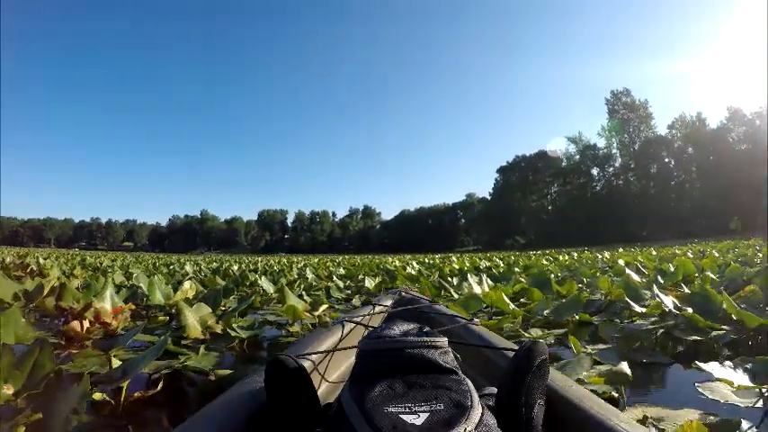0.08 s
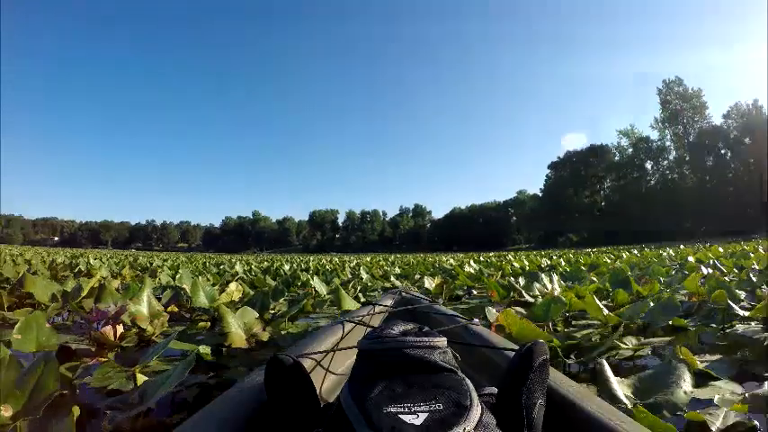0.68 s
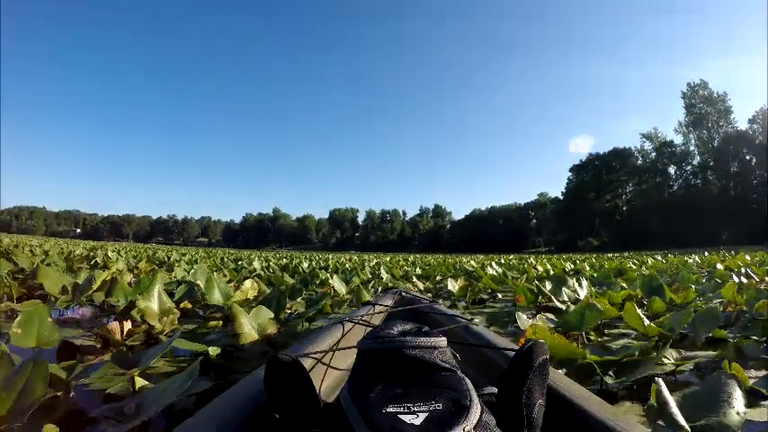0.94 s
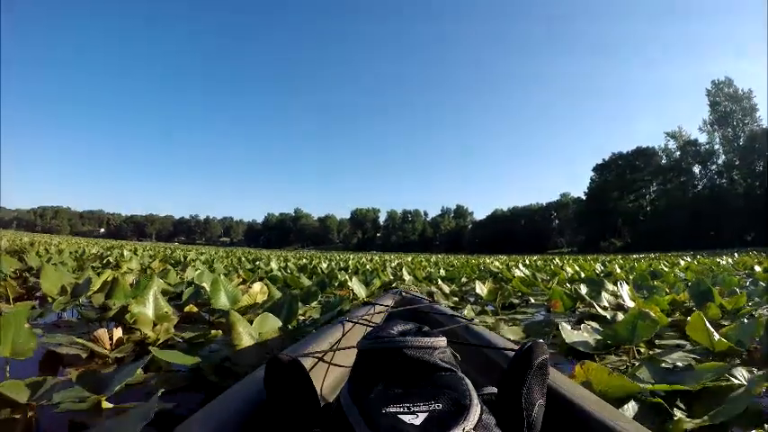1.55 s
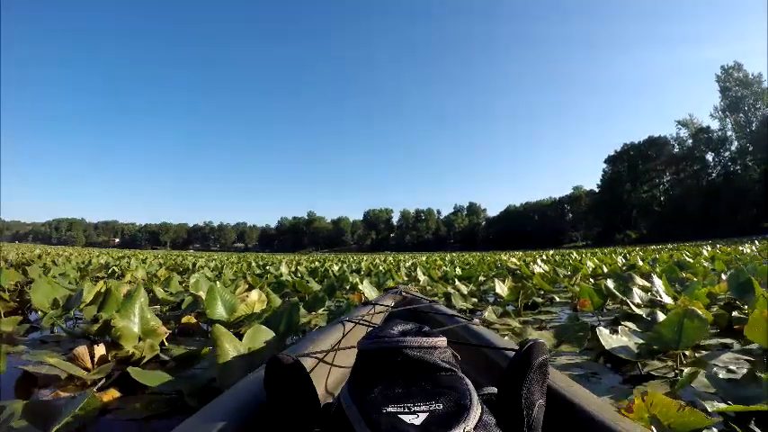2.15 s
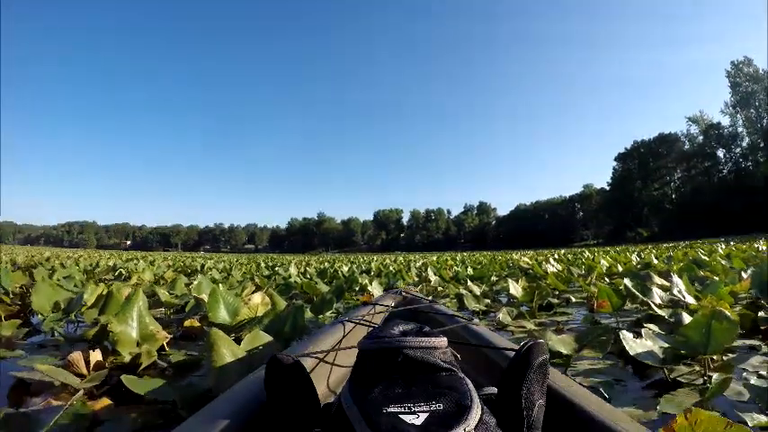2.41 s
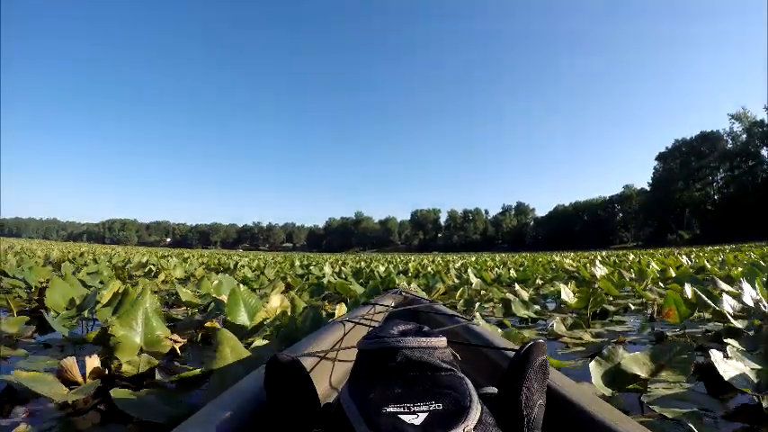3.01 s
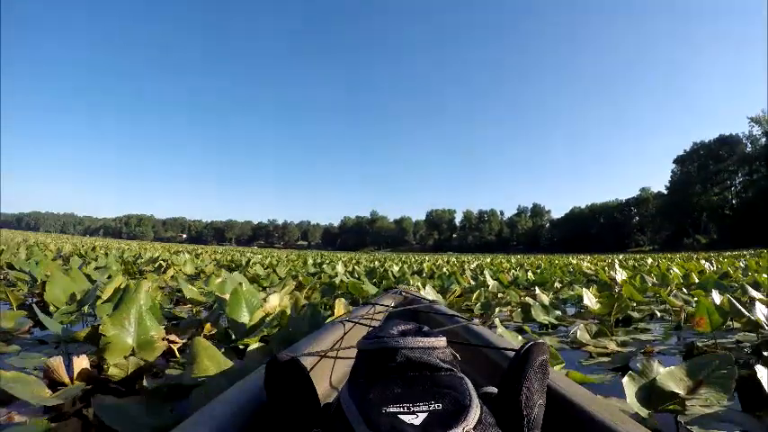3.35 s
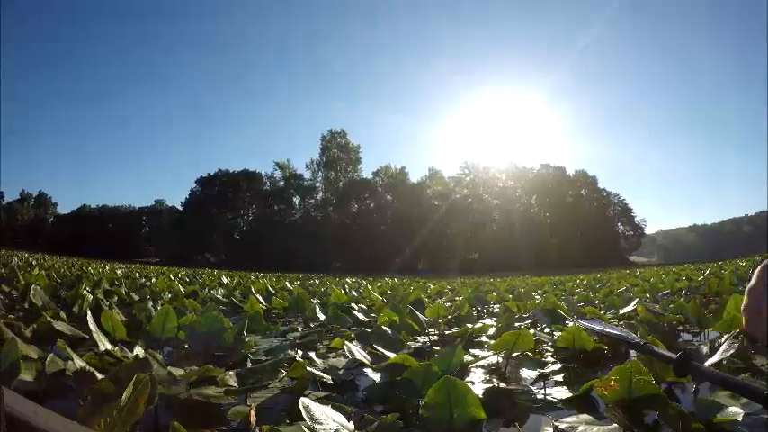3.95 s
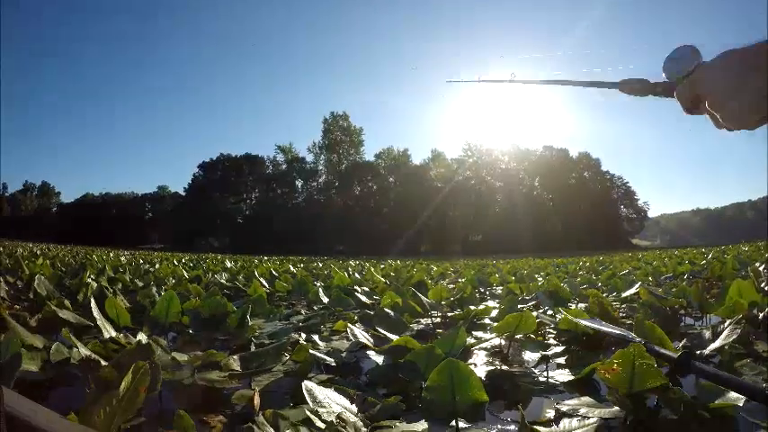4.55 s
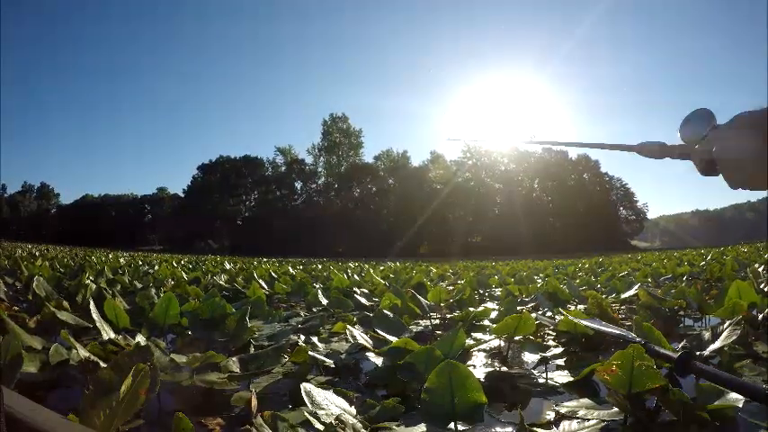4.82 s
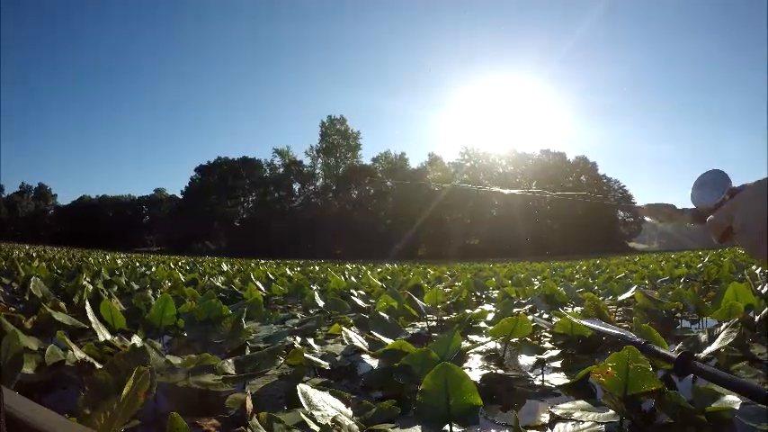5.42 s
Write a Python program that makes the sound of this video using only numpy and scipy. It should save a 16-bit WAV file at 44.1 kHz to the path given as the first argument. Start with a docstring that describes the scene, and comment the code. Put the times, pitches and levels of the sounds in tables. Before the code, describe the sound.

Heard from the deck of a plastic kayak on a lake, a sharp knock opens a glide through lily pads. Stems drum on the hollow hull, wet leaves rub and flick along the sides, and water sloshes softly. The brushing stops abruptly. A fishing rod then swishes through the air and line hisses off the spool, fading over low wind and rocking rumble.

```python
"""A plastic kayak glides through lily pads, heard from its own deck. After one hard knock, stems drum
on the hollow hull and excite its resonances, water sloshes as a crowd of ringing bubbles, and wet leaves
rub and flick along the sides. The scene changes abruptly to the boat at rest, where an angler casts:
the rod sheds eddies with a swish, line hisses off the spool and the swing rocks the boat.
Light wind and a faint hiss lie under it all."""
import sys
import numpy as np
from scipy import signal
from scipy.fft import rfft, irfft
from scipy.io import wavfile
from scipy.ndimage import uniform_filter1d

SR = 44100
rng = np.random.default_rng(int(sys.argv[2]) if len(sys.argv) > 2 else 0)


def persist_wave(psi):
    """Save psi, clipped to +-1, as 16-bit WAV."""
    counts = np.round(np.clip(psi, -1, 1) * 32767).astype(np.int16)
    wavfile.write(sys.argv[1], SR, np.atleast_2d(counts).T)


N = 245195
T = np.arange(N) / SR
GLIDE_END_S = 3.692
STROKE_S, SWING_S, RELEASE_S = 3.966, 4.054, 4.088  # stroke starts, rod tip is fastest, line flies free

# Spectra. Each row: frequency in Hz, relative spectral density in dB.
WIND_SPECTRUM = [(15, 3.5), (27, -11), (44, -8), (60, -18.5), (80, -25.5), (98, -26.5), (135, -37.5),
                 (190, -38), (300, -51.5)]
HISS_SPECTRUM = [(100, -28), (170, -3), (198, 8), (217, 3.5), (367, -0.5), (442, -2), (543, -1.5),
                 (734, -4.5), (902, -4.5), (1170, -7.5), (2260, -7.5), (5250, -11), (7100, -15),
                 (7800, -14), (8500, -16), (10300, -17.5), (12400, -21), (15000, -17.5)]
PEEL_SPECTRUM = [(1400, 8.5), (2000, 6.5), (2600, 3.5), (3400, 1), (4300, 2), (5400, -10), (6600, 2.5),
                 (8500, -9)]  # pops of wet pads peeling off
LEAF_SPECTRUM = [(760, -31), (1300, -6), (1770, 6.5), (2740, 3), (3020, -13), (3270, 1), (4140, -5),
                 (5360, -10.5), (6560, -9), (7170, -15), (9000, -32), (11700, -57), (19800, -120)]  # the leaves themselves
RUB_SPECTRUM = [(160, -42), (280, -6), (361, 1), (445, -6.5), (512, -0.5), (598, -11), (664, -4.5),
                (733, -9), (781, -1.5), (855, -10), (991, 1.5), (1210, -14.5), (1500, -31), (1950, -29),
                (3300, -120)]  # the hull rubbed by leaves
HULL_SPECTRUM = [(115, -13), (138, 3), (175, 0.5), (212, -2.5), (260, -11), (330, -20.5), (450, -25.5)]  # the hollow hull under the stems
# Swells. Each row: centre in seconds, half-width in seconds, level in dB.
WIND_GUSTS = [(0.05, 0.15, -33.5), (0.33, 0.26, -40), (0.63, 0.038, -33.5), (0.85, 0.52, -35),
              (2.32, 0.023, -40.5), (2.63, 0.047, -36), (3.25, 1, -46), (3.98, 0.061, -33.5),
              (4.135, 0.064, -29), (4.17, 0.21, -33), (4.4, 0.25, -40.5), (4.79, 0.053, -41.5),
              (4.97, 0.066, -50), (5.34, 0.08, -43)]  # gusts and rocking of the boat
WATER_SHOVES = [(0.64, 0.053, -57.5), (0.728, 0.037, -53), (0.86, 0.081, -64), (2.83, 0.039, -56),
                (3.02, 0.15, -67), (3.3, 0.2, -64.5), (4.19, 0.23, -66)]  # water pushed aside by the hull
STEM_CLUMPS = [(0.315, 0.1, -39), (0.62, 0.043, -43), (0.79, 0.033, -36.5), (1.07, 0.034, -47),
               (2.38, 0.062, -46), (2.76, 0.14, -40.5), (3.27, 0.074, -42.5)]  # thick stems passing underneath
# Bands of the fishing line. Each row: centre in Hz, width in Hz, relative level in dB.
GUIDE_BANDS = [(2440, 130, -9), (2850, 200, -3.5), (3210, 220, 0), (3520, 390, 3.5), (5100, 250, -14),
               (5850, 400, -10), (7900, 700, -12)]  # singing in the guides
WHIP_BANDS = [(2100, 600, 0), (4400, 1700, -2.5), (5800, 700, -2.5), (6750, 350, -7), (7820, 750, -4),
              (11000, 4300, -6)]  # bright hiss at the height of the stroke
WHISTLE_BANDS = [(9950, 770, -4), (10900, 600, -4), (11650, 600, 0), (12450, 750, -2)]  # cutting the air
# Drops and bubbles beside the hull, then bumps and glugs under it.
# Each row: start in seconds, level in dB, initial frequency in Hz, decay time in seconds.
BUBBLE_RINGS = [(0.104, -46, 1274, 0.0052), (.264, -46, 770, 0.0068), (.275, -39, 970, 0.0023),
                (0.579, -60, 1096, 0.01), (.642, -52.5, 746, 0.039), (.868, -58, 1075, 0.0084),
                (2.043, -55, 3400, 0.0026), (2.261, -57, 1730, 0.003), (2.545, -54.5, 1410, 0.003),
                (2.594, -54.5, 1100, 0.0065), (2.905, -60, 6070, 0.0065), (2.94, -51.5, 7780, 0.0008),
                (3.05, -53.5, 1030, 0.0062), (3.094, -45.5, 2200, 0.0031), (3.680, -40.5, 2430, 0.0017)]
HULL_BUMPS = [(0.044, -27, 60.7, 0.012), (0.047, -29.5, 116, 0.014), (0.566, -45.5, 271, 0.01),
              (0.61, -29, 51, 0.016), (0.617, -48, 365, 0.008), (0.617, -40, 140, 0.0069),
              (.712, -56, 550, 0.0044), (0.713, -49, 410, 0.0039), (0.739, -29.5, 131, 0.013),
              (0.848, -35, 192.4, 0.013), (0.881, -49, 330, 0.0086), (2.02, -45.5, 164, 0.016),
              (2.295, -33, 40, 0.018), (2.348, -39, 88, 0.017), (2.573, -32.5, 102.4, 0.017),
              (2.78, -42, 212, 0.019), (3.562, -45, 187, 0.017), (4.07, -44, 132, 0.015),
              (4.104, -26, 38, 0.027)]
# Leaves and stems flicking the hull. Each row: start in seconds, level in dB, centre in Hz, width in Hz.
LEAF_FLICKS = [(.077, -58.5, 5500, 5000), (.105, -52.5, 2400, 2500), (.135, -55, 1900, 1300),
               (0.148, -44.5, 2080, 1700), (0.149, -52, 4240, 600), (0.174, -46, 2520, 800),
               (0.197, -50, 2060, 2220), (.199, -60, 4740, 901), (0.228, -51, 3870, 700),
               (0.288, -51.5, 2600, 600), (0.371, -54.5, 4280, 1530), (0.607, -53, 2380, 900),
               (.711, -60, 2670, 500), (1.130, -52.5, 2360, 900), (2.043, -57, 3480, 900),
               (2.238, -58, 2050, 600), (2.434, -52, 1930, 1500), (2.588, -61, 1750, 800),
               (2.628, -57, 1590, 1500), (2.769, -56, 4330, 1196), (2.784, -60, 5400, 2400),
               (2.797, -59, 3600, 700), (2.834, -57, 4140, 1200), (2.867, -55, 4400, 900),
               (2.8847, -42.5, 3600, 1100), (2.8995, -51, 3370, 900), (2.981, -58, 3000, 900),
               (2.939, -51, 4000, 2970), (2.939, -65, 10000, 4000), (3.092, -55.5, 3000, 3000),
               (3.112, -61, 5500, 3000), (3.095, -61, 6500, 900), (3.14, -65, 6500, 1500),
               (3.224, -54, 3860, 2520), (3.262, -57, 3700, 1000), (3.275, -54, 3900, 2000),
               (3.279, -63, 7000, 2400), (3.297, -64, 4800, 4000), (3.31, -49, 2600, 1500),
               (3.398, -51, 2060, 1100), (3.398, -58, 4000, 2000), (3.513, -52, 2110, 900),
               (3.545, -58.5, 4300, 2200), (3.679, -49.5, 2550, 900)]
# Bunches of dragging pads. Each row: centre in seconds, half-width in seconds, level in dB, pitch in Hz.
PAD_DRAGS = [(0.175, 0.12, -61, 2420), (0.347, 0.21, -67.5, 4280), (0.777, 0.03, -68.5, 6900),
             (1.157, 0.07, -67.5, 4300), (2.897, 0.077, -62.5, 3770), (3.29, 0.23, -66.5, 4000),
             (3.577, 0.096, -62, 3440)]
# Modes of the deck. Each row: frequency in Hz, relative level in dB, time to fall 60 dB in seconds.
DECK_MODES = [(335, 7.5, 0.014), (457, -6, 0.024), (666, -1, 0.019), (993, -4.5, 0.084), (1120, -15, 0.034),
              (1680, -6, 0.034), (1880, -19, 0.079), (2194, -1.5, 0.015), (2354, 9.5, 0.0092),
              (2510, -0.5, 0.012), (3700, -7.5, 0.008), (4550, -26, 0.027)]
# The knock and its chatter. Each row: start in seconds, gain in dB.
DECK_CONTACTS = [(.0382, -28), (.0398, -28), (.0426, -26)]
# Force of the hull on the pads as it slows and is driven on. Each row: time in seconds, push in dB.
HULL_PUSH = [(0.1, 1.5), (0.35, 4), (0.7, 2.5), (1.0, 1), (1.3, -1), (1.9, -1.5), (2.18, -2.5), (2.5, -0.5),
             (2.8, 1.5), (3.1, 0), (3.68, -1)]


def undb(db):
    """Amplitude grows tenfold for every 20 dB."""
    return 10 ** (np.asarray(db) / 20)


def unit(x):
    """Normalisation to an rms of 1."""
    return x / np.sqrt(np.mean(x ** 2))


def steady(x):
    """Division by the short-term rms, so that an envelope alone sets the strength."""
    return x / np.sqrt(np.abs(uniform_filter1d(x ** 2, size=4000)) + 1e-12)


def noise():
    """White noise: equal mean power at every frequency."""
    return rng.standard_normal(N)


def wander(rate):
    """Linear interpolation of `rate` random values a second, with a spread near 1."""
    knots = rng.standard_normal(4096)
    return 1.2 * np.interp(T * rate, np.arange(len(knots)), knots)


def impacts(rate, spread_db):
    """A Poisson process of `rate` tiny impacts a second, a few much larger than the rest."""
    size = undb(spread_db * np.minimum(rng.exponential(size=N), 4))
    return unit((rng.random(N) < rate / SR) * size * rng.choice([-1, 1], N))


def colour(x, spectrum):
    """Spectral shaping to an rms of 1, falling 30 dB an octave past the ends of the table."""
    hz, db = np.transpose(spectrum)
    octave = np.log2(np.maximum(np.fft.rfftfreq(N, 1 / SR), 1))
    outside = np.abs(octave - np.clip(octave, np.log2(hz[0]), np.log2(hz[-1])))
    gain = undb(np.interp(octave, np.log2(hz), db) - 30 * outside)
    return unit(irfft(rfft(x) * gain, N))


def band(x, hz, width):
    """Two equal resonators in cascade give a band with steep sides."""
    hz = min(hz, .4 * SR)
    b, a = signal.iirpeak(hz, max(hz / width, .5), fs=SR)
    return signal.lfilter(b, a, signal.lfilter(b, a, x))


def noise_bands(bands):
    """Resonances driven by independent noises add in power; the sum has an rms of 1."""
    return unit(sum(undb(db) * unit(band(noise(), hz, width)) for hz, width, db in bands))


def swells(rows):
    """Gaussian swells add in power. Each row: centre in seconds, half-width in seconds, level in dB."""
    return np.sqrt(sum((undb(db) * np.exp(-2 * ((T - s) / width) ** 2)) ** 2 for s, width, db in rows))


def envelope(start, end, rise_db_per_s, fall_db_per_s):
    """Exponential growth until start, a hold at 1 until end, then exponential decay."""
    return undb(-rise_db_per_s * np.maximum(start - T, 0) - fall_db_per_s * np.maximum(T - end, 0))


def add(out, s, x):
    """Superposition of a short sound at s seconds."""
    i = max(int(s * SR), 0)
    out[i:i + len(x)] += x[:N - i]


def rings(rows, rise, climb):
    """Damped oscillators; rise is a fraction of the decay time, climb a fraction of the pitch."""
    out, t = np.zeros(N), T[:SR // 4]
    for s, db, hz, decay in rows:
        shape = (1 - np.exp(-t / (rise * decay))) ** 2 * np.exp(-t / decay)
        pitch = hz * (1 + climb * (1 - np.exp(-t / decay)))
        add(out, s, undb(db) * shape / shape.max() * np.sin(2 * np.pi * np.cumsum(pitch) / SR))
    return out


def air(moving_db=-45.5, resting_db=-49):
    """Pressure fluctuations of wind and rocking rumble; ripples drive a hull resonance; treble hisses."""
    breeze = undb(np.where(T < GLIDE_END_S, moving_db, resting_db))
    rumble = steady(colour(noise(), WIND_SPECTRUM)) * np.hypot(breeze, swells(WIND_GUSTS))
    murmur = unit(band(noise(), hz=95, width=38)) * undb(-59)
    hiss = colour(noise(), HISS_SPECTRUM) * undb(-64.5 + .5 * wander(rate=8.5))
    treble = band(noise(), hz=12360, width=2300)
    flicker = undb(11 * np.tanh(0.91 * wander(rate=210) - 1.4))
    return rumble + murmur + hiss + unit(treble * flicker) * undb(-79)


def rod(eddy_hz=1130, sag=0.12, waver=0.1, half_width_s=0.0072):
    """Vortex shedding: eddies leave the tip almost regularly, highest in pitch where it is fastest."""
    speed = 1 / (1 + ((T - SWING_S) / half_width_s) ** 2)
    pitch = eddy_hz * (1 - sag * (1 - speed)) * (1 + waver * wander(rate=850))
    eddies = unit(np.sin(2 * np.pi * np.cumsum(pitch) / SR))
    whole_swing = swells([(SWING_S, 0.054, -67)])
    return eddies * np.hypot(undb(-50.5) * speed, whole_swing)


def fishing_line():
    """Friction and airflow: line sings in the guides, cuts the air and brushes the slowing spool."""
    running = undb(-58.5) * envelope(STROKE_S, RELEASE_S, rise_db_per_s=1100, fall_db_per_s=113)
    pull = swells([(RELEASE_S - 0.016, 0.03, -52)])  # the lure draws the line taut
    whip = undb(-57.5) * envelope(RELEASE_S - 0.022, RELEASE_S, rise_db_per_s=150, fall_db_per_s=300)
    unwinding = undb(-61.5) * envelope(RELEASE_S, RELEASE_S, rise_db_per_s=400, fall_db_per_s=36)
    singing = noise_bands(GUIDE_BANDS) * np.hypot(running, pull)
    hiss = noise_bands(WHIP_BANDS) * whip
    whistle = noise_bands(WHISTLE_BANDS) * swells([(SWING_S, 0.05, -62)])
    coils = steady(band(noise(), hz=2360, width=370) * undb(1.2 * wander(rate=260)))
    slap = undb(1.4 * wander(rate=300))  # the line flutters against the guides
    return slap * (singing + hiss + whistle) + coils * unwinding


def sloshes(count=2400, low_hz=227.3, high_hz=1045, cycles=5, climb=0.11, tilt_db_per_octave=-4):
    """Bubble resonance in a crowd: shoved water churns with short rising tones, large bubbles loudest."""
    churn, t = np.zeros(N), T[:SR // 14]
    for when, pitch, strength in rng.random((count, 3)):
        hz = low_hz * (high_hz / low_hz) ** pitch
        age = t * hz / cycles
        phase = 2 * np.pi * np.cumsum(hz * (1 + climb * (1 - np.exp(-age)))) / SR
        gain = strength * undb(tilt_db_per_octave * np.log2(hz))
        add(churn, when * T[-1], gain * age * np.exp(-2 * age) * np.sin(phase))
    return steady(churn) * swells(WATER_SHOVES)


def bubbles(flutter=0.28):
    """Pockets of air resonate and rise in pitch, their level uneven as the leaves squeeze them."""
    return rings(BUBBLE_RINGS, rise=0.18, climb=0.082) * (1 + flutter * wander(rate=1300))


def bumps():
    """Damped vibration: the hull booms briefly under soft pushes from thick stems and small waves."""
    return rings(HULL_BUMPS, rise=0.45, climb=0)


def flicks(crack_rate=2600, rise_s=0.0013, decay_s=0.0019, tail_s=0.0064, tail_db=-17, trim_db=-2):
    """Elastic release: a bent leaf slips free in a run of tiny cracks, a snap with a scrape after it."""
    out, t = np.zeros(N), T[:SR // 12]
    attack = (1 - np.exp(-t / rise_s)) ** 2
    shape = attack * (np.exp(-t / decay_s) + undb(tail_db) * np.exp(-t / tail_s))
    for s, db, hz, width in LEAF_FLICKS:
        cracks = rng.standard_normal(2 * len(t)) * (rng.random(2 * len(t)) < crack_rate / SR)
        snap = band(cracks, hz, width)[len(t):] * shape
        peak_rms = np.sqrt(uniform_filter1d(snap ** 2, size=128).max())
        add(out, s, undb(db + trim_db) * snap / peak_rms)
    return out


def drags(catch_db=4):
    """Stick-slip friction: wet pads peel along the side in pops so dense that they merge into brushing."""
    pops = colour(impacts(rate=6500, spread_db=3.5), PEEL_SPECTRUM)
    pops *= undb(catch_db * wander(rate=160))
    return sum(steady(band(pops, hz, width=hz)) * swells([(s, half_width, db)])
               for s, half_width, db, hz in PAD_DRAGS)


def knock(contact_s=0.0019):
    """Modal ringing: something hard chatters on the deck; the plastic gives, softening each attack."""
    out, t = np.zeros(N), T[:SR // 4]
    deck = sum(undb(db - 60 * t / t60) * np.sin(2 * np.pi * hz * t) for hz, db, t60 in DECK_MODES)
    attack = 1 - np.exp(-(t / contact_s) ** 2)
    for s, db in DECK_CONTACTS:
        add(out, s, undb(db) * deck * attack)
    return out


def glide():
    """Forced vibration: stems drum on the hollow hull, pads rub and leaves rustle, rising with the push."""
    push_db = np.interp(T, *np.transpose(HULL_PUSH))
    stems = impacts(rate=500, spread_db=1)
    boom = steady(band(stems, hz=97.36, width=15))
    boom *= np.hypot(undb(-49.5 + push_db), swells(STEM_CLUMPS))
    floor_flex = steady(band(stems, hz=58, width=30)) * undb(-50.5 + push_db)
    drum = steady(colour(stems, HULL_SPECTRUM))
    drum *= undb(-51.5 + 1.63 * push_db + 2.23 * wander(rate=14))
    rub = colour(impacts(rate=2500, spread_db=2.5), RUB_SPECTRUM)
    rub *= undb(-62.5 + 0.79 * push_db + 0.57 * wander(rate=18))
    rustle = colour(impacts(rate=6200, spread_db=3.5), LEAF_SPECTRUM)
    rustle *= undb(-67.5 + 1.27 * push_db + 1.36 * wander(rate=68))
    return boom + floor_flex + drum + rub + rustle


def scene(fade_s=0.0048):
    """Superposition in one channel: the glide, cut short, then the cast, over water and wind."""
    moving = np.clip((GLIDE_END_S - T) / fade_s, 0, 1)
    under_way = glide() + drags() + knock() + flicks() + bubbles()
    return (moving * under_way + bumps() + sloshes() + rod() + fishing_line() + air())[None]


def record(dry, cutoff_hz=15200):
    """A steep low-pass filter removes the top of the treble."""
    return signal.sosfilt(signal.ellip(10, .2, 70, cutoff_hz, fs=SR, output="sos"), dry)


dry = scene()
out = record(dry)
persist_wave(out)
```